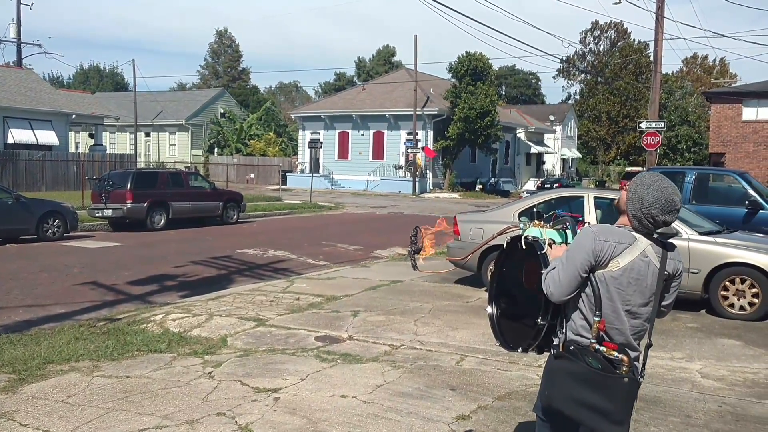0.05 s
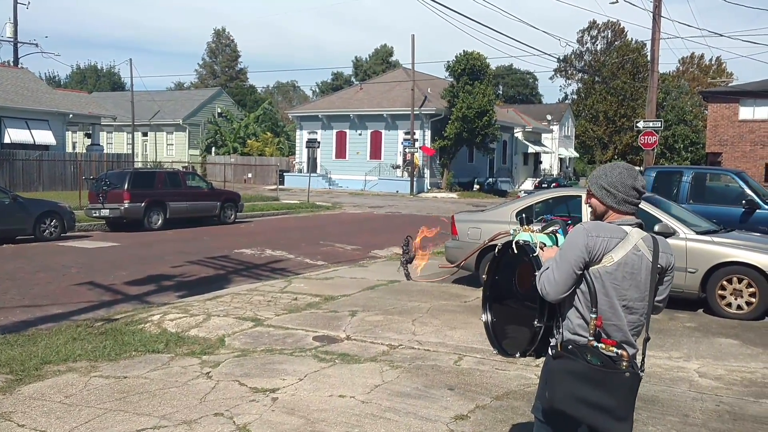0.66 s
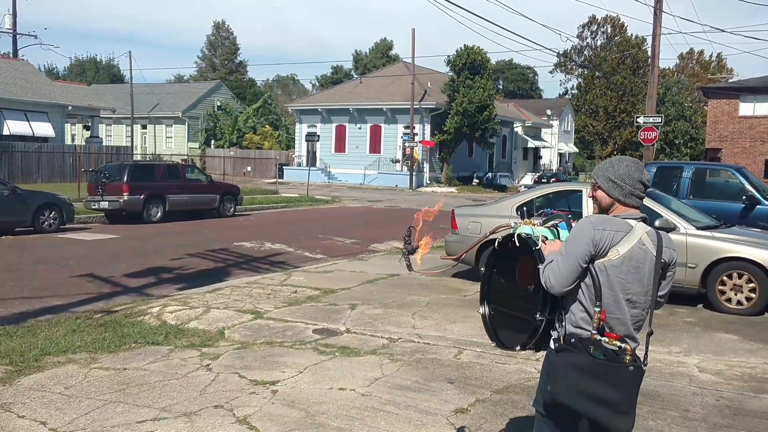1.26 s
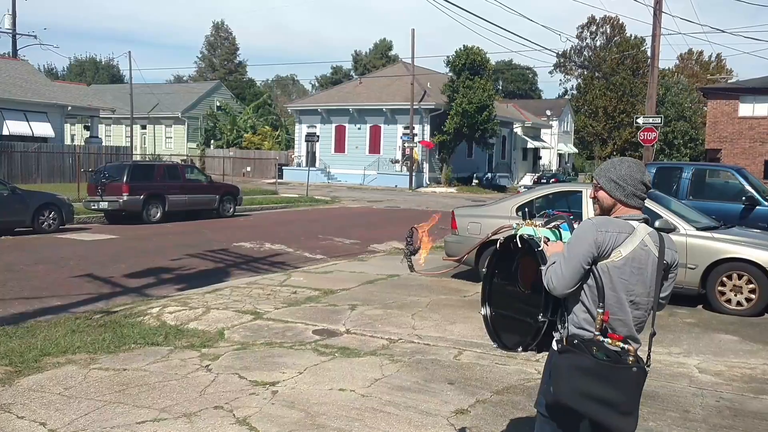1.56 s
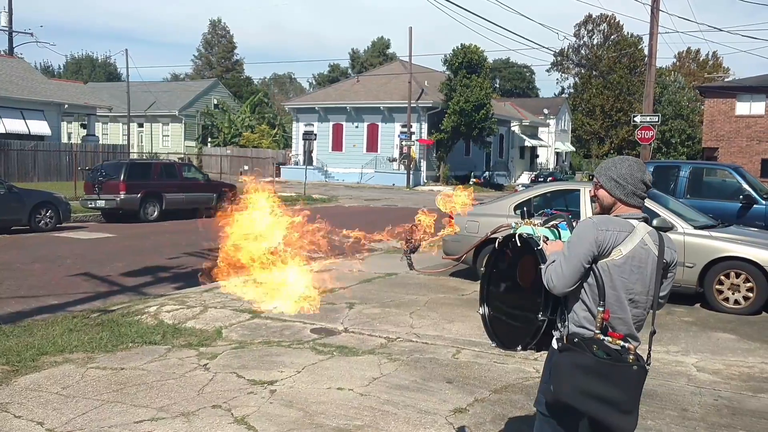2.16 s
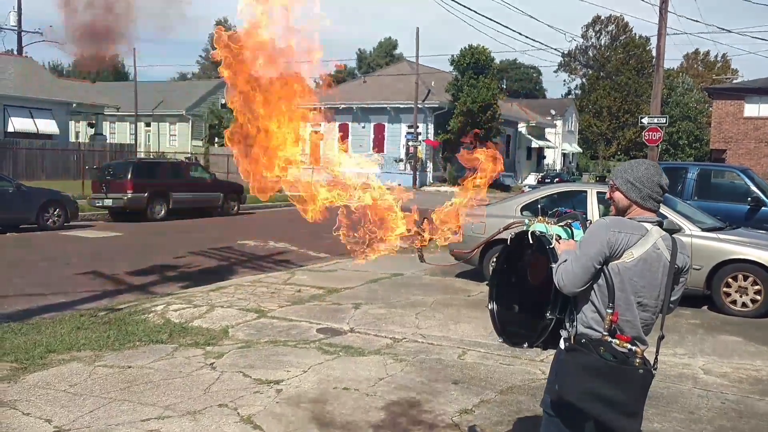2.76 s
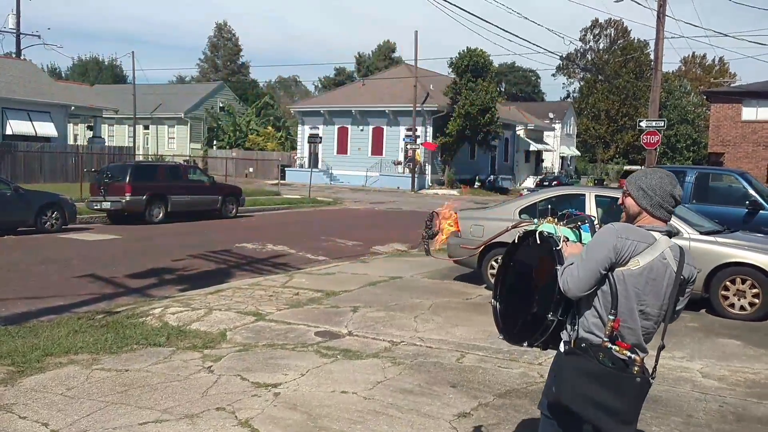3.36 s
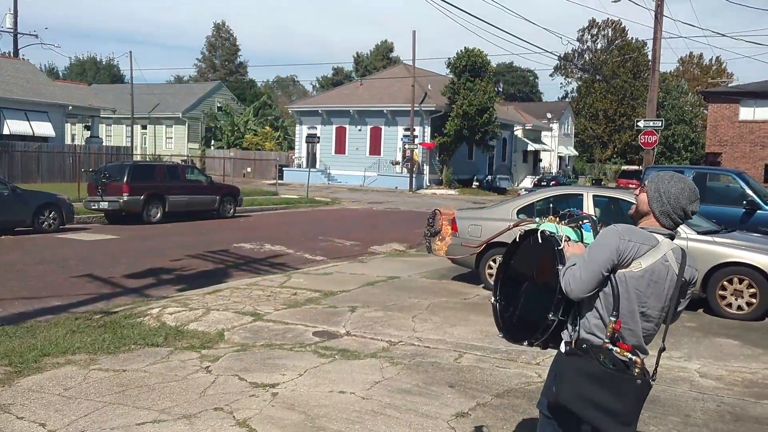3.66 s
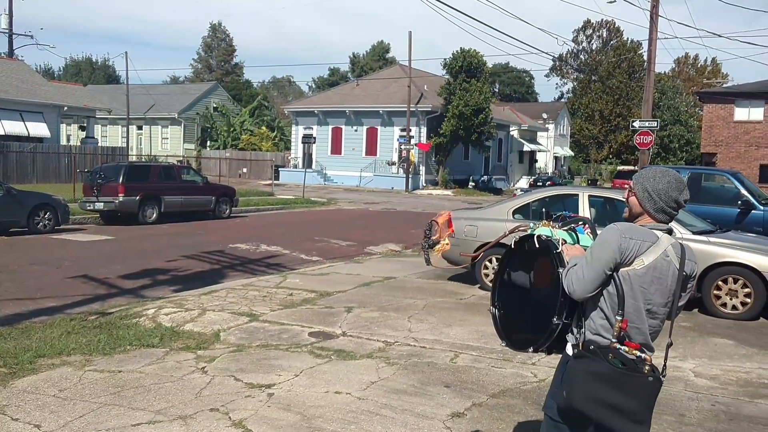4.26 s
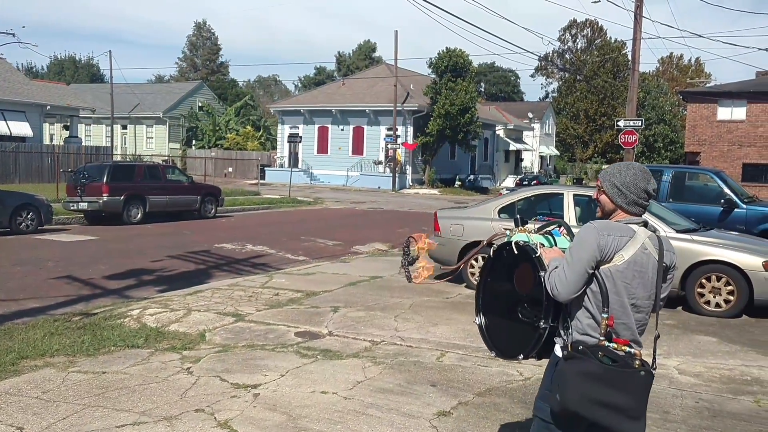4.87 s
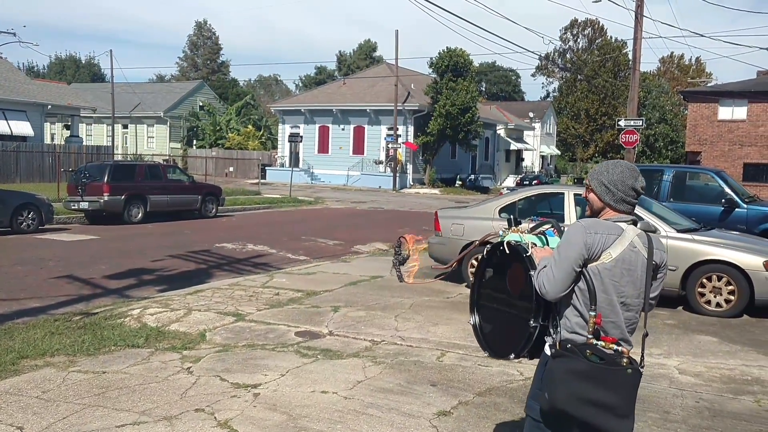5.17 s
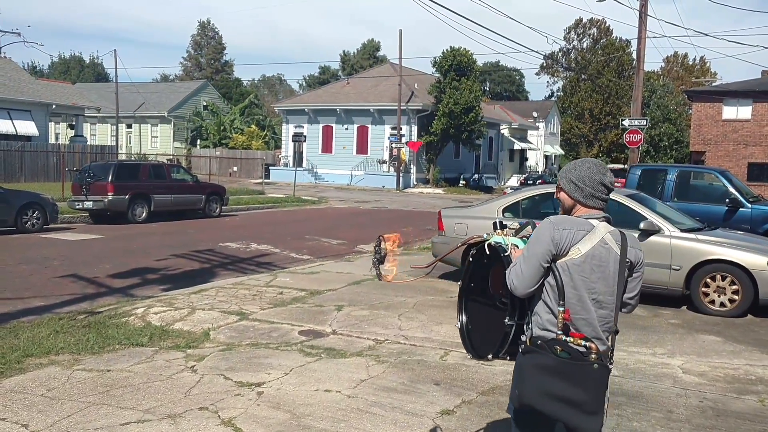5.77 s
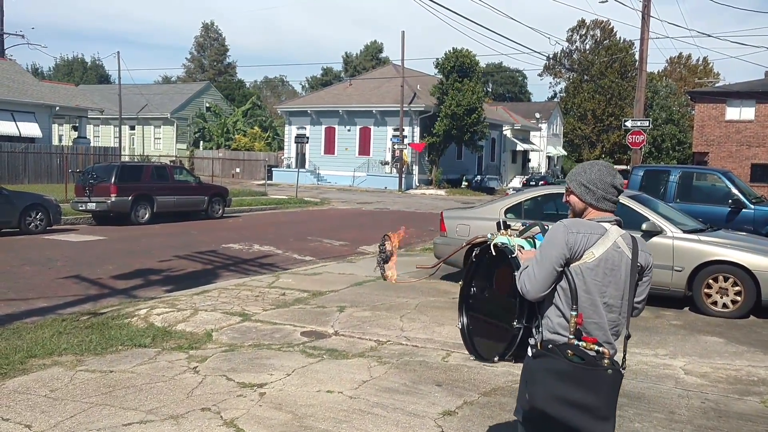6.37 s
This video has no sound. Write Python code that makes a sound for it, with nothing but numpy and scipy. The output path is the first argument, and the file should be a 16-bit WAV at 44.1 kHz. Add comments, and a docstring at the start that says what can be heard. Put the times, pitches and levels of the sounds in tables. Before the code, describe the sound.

Faint traffic and a hissing pilot flame, then a sudden whoosh and roar of fire that dies away, leaving low wind thuds.

```python
"""A quiet street, with a wash of distant traffic, a hissing pilot flame and a breeze buffeting two mics.
A flamethrower fires one burst: the valve snaps, the fuel jet hisses, and the fireball catches with a
thump and roars away, echoing off pavement, cars and house fronts. Small ticks, a thin insect buzz and
a far bird sit behind it. The camera widens the stereo image, and its limiter ducks the street under
the burst, then lets it swell slowly back."""
import sys
import numpy as np
from scipy import signal
from scipy.fft import rfft, irfft, next_fast_len
from scipy.io import wavfile
from scipy.ndimage import uniform_filter1d, minimum_filter1d, map_coordinates

SR = 44100
rng = np.random.default_rng(int(sys.argv[2]) if len(sys.argv) > 2 else 0)


def store_pcm(level_fs):
    """Save levels as 16-bit WAV."""
    pcm = np.round(np.clip(level_fs, -1, 1) * 32767).astype(np.int16)
    wavfile.write(sys.argv[1], SR, np.atleast_2d(pcm).T)


N = 287091
TIME = np.arange(N) / SR
VALVE_OPENS_S = 2.074
# how alike the ambience is at the two mics: f/Hz, correlation
MIC_LIKENESS = [(60, 0.92), (300, 0.91), (550, 0.68), (950, 0.42), (1500, -0.16), (2200, 0.023),
                (3300, 0.26), (5000, -0.02), (7500, 0.46), (10000, -0.021), (14500, -0.36)]


def gain_of(db):
    """Decibels to amplitude."""
    return 10 ** (np.asarray(db) / 20)


def unit_rms(x):
    """Scales to rms 1."""
    return x / np.sqrt(np.mean(x ** 2) + 1e-20)


def curve_at(points, hz):
    """A frequency curve, its points joined by straight lines over log frequency."""
    f, value = np.transpose(points)
    return np.interp(np.log(hz + 1), np.log(f + 1), value)


def automation(points):
    """A time curve's value at every sample."""
    return np.interp(TIME, *np.transpose(points))


def envelope(start, rise, until, fall_db_per_s, sag_db_per_s=0):
    """Ramps up, holds or sags until a given time, then dies away; times in seconds."""
    held = np.clip(TIME, start, max(start, until)) - start
    released = np.maximum(TIME - until, 0)
    attack = np.clip((TIME - start) / rise, 0, 1)
    return attack * gain_of(-sag_db_per_s * held - fall_db_per_s * released)


def delayed(x, seconds):
    """Delays by any fraction of a sample."""
    size = next_fast_len(N + SR // 10)
    hz = np.fft.rfftfreq(size, 1 / SR)
    return irfft(rfft(x, size) * np.exp(-2j * np.pi * hz * seconds), size)[..., :N]


def flutter(hz):
    """Random modulation of rms 1, moving at rates up to about hz."""
    f = np.fft.rfftfreq(N, 1 / SR)
    return unit_rms(irfft(rfft(rng.standard_normal(N)) / (1 + (f / hz) ** 2), N))


def noise(spectrum, patchy_db, tilt_db=0 * TIME, likeness=((20, 0), (20000, 0))):
    """Stereo coloured noise with drifting spectral patches, as long as its tilt curve (dB/octave)."""
    size = len(tilt_db)
    frames, hz = size // 256 + 5, np.fft.rfftfreq(1024, 1 / SR)
    a, b, c, d, patches = rng.standard_normal((5, frames, 513))
    patches = unit_rms(uniform_filter1d(uniform_filter1d(patches, size=8, axis=0), size=14, axis=1))
    slope = np.interp(np.arange(frames) * 256, np.arange(size), tilt_db)
    tilt = slope[:, None] * np.log2((hz + 1000) / 7000)
    alike = np.clip(curve_at(likeness, hz), -1, 1)
    left = a + 1j * b
    right = alike * left + np.sqrt(1 - alike ** 2) * (c + 1j * d)
    colour = gain_of(curve_at(spectrum, hz) + patchy_db * patches + tilt) * (hz > 0)
    spectra = np.array([left, right]) * colour
    return signal.istft(spectra.transpose(0, 2, 1), nperseg=1024, noverlap=768)[1][:, :size]


def eddy(at, hz, soft=6.1):
    """One swing of pressure: a peak between two troughs, more pointed the less soft it is."""
    u = (np.pi * hz * (TIME - at)) ** 2
    return (1 - (2 + 1 / soft) * u) / (1 + u / soft) ** (soft + 2)


def traffic():
    """Distant traffic merges into one slowly drifting wash."""
    # colour of the wash: f/Hz, level/dB
    spectrum = [(30, -39), (55, -5.5), (95, 3), (180, -3), (330, -4.5), (520, -10.5), (950, -10.5),
                (1500, -17), (1900, -20), (2250, -23.5), (2700, -20), (3400, -25.5), (5000, -33),
                (14500, -53)]
    # its slow drift: t/s, gain/dB
    drift = [(0, 0.7), (.72, 0), (.86, 2.1), (1.05, 0.1), (1.7, -1.5), (2.2, 0.3), (3.1, -2.5), (3.8, -2),
             (4.7, -2), (5.6, 0.8), (6.15, 0.5), (6.5, 4)]
    wash = unit_rms(noise(spectrum, patchy_db=0.71, likeness=MIC_LIKENESS))
    return wash * gain_of(-39 + automation(drift) + 0.57 * flutter(hz=6.9))


def pilot_flame():
    """The pilot flame burns with a faint, steady hiss."""
    # colour of the hiss: f/Hz, level/dB
    spectrum = [(1500, -25), (2600, 2), (3400, -1.5), (4200, -6), (5200, 4.5), (6100, -3), (6700, -8),
                (7350, 1.5), (7900, -6), (8800, -4), (9500, -7.5), (10700, -4.5), (12000, -13.5),
                (14500, -14.5)]
    # its loudness: t/s, level/dB
    level = [(0, -58), (.72, -57), (.86, -57), (1.05, -56.5), (2.0, -56.5), (3.2, -56.5), (4.2, -58),
             (5.2, -56), (6.1, -56.5), (6.5, -53)]
    hiss = unit_rms(noise(spectrum, patchy_db=1.5, likeness=MIC_LIKENESS))
    return hiss * gain_of(automation(level) + 0.45 * flutter(hz=11.0))


def breeze():
    """Lumpy, gusting turbulence, separate at each mic; single eddies hit the windward one."""
    # colour of the turbulence: f/Hz, level/dB
    spectrum = [(25, -18), (50, -15), (90, 7), (150, 5.5), (230, -7), (350, -16), (550, -30), (1000, -43),
                (2500, -78)]
    # the breeze between gusts: t/s, level/dB
    strength = [(0, -46), (.4, -53), (1.3, -51), (1.85, -33.5), (3.2, -35.5), (3.7, -53), (4.35, -51.5),
                (4.9, -38), (6.5, -28.5)]
    # which mic it favours: t/s, left minus right/dB
    side = [(0, 7), (1.4, 3.5), (4.75, 9), (5.08, 4.5), (5.2, -18), (6.35, -14), (6.5, -6)]
    # gusts: t/s, length/s, level/dB
    gusts = [(0.86, 0.084, -38), (1.042, 0.042, -38), (1.389, 0.03, -35), (1.602, 0.05, -30),
             (1.973, 0.023, -34), (2.884, 0.069, -26.5), (4.568, 0.13, -26), (5.195, 0.15, -26),
             (5.823, 0.26, -26.5), (6.33, 0.035, -30)]
    # single eddies: t/s, peak/dB, f/Hz
    buffets = [(0.874, -26, 157), (1.422, -12.5, 173), (1.526, -22, 180), (1.618, -25, 170),
               (1.6278, -20, 126), (1.642, -17, 120), (1.657, -17, 127), (1.6672, -13, 127),
               (1.697, -21, 145), (1.71, -23, 156), (1.76, -20, 153), (1.828, -19, 120), (1.839, -0.5, 153),
               (1.868, -13.5, 127), (1.9132, 0.5, 190), (2.0118, -15.5, 133), (2.731, -18, 148),
               (2.918, -9, 171), (3.11, -19.5, 159), (3.21, -19, 160), (4.5946, -7, 190),
               (4.6242, -12, 237), (4.6375, -19, 150), (4.6524, -27, 185), (4.6833, -10.5, 193),
               (4.693, -17, 151), (4.7253, -11, 174), (5.0603, -20.5, 153.9), (5.212, -11.5, 178.8),
               (5.2238, -15, 194), (5.251, -17, 148), (5.2721, -21, 183), (5.2916, -11.5, 215),
               (5.3291, -16, 144), (5.3512, -22, 180), (5.5024, -19, 153), (5.5182, -11, 231),
               (5.5686, -18, 143), (5.655, -21, 145), (5.8358, -23, 131), (5.8642, -15, 137),
               (5.9008, -7.5, 176), (5.9354, -22, 141), (5.9656, -13.5, 159), (5.984, -19, 203),
               (5.995, -10.5, 168), (6.0151, -15.5, 153), (6.0363, -5.5, 165), (6.0661, -4, 178),
               (6.1081, -18, 140), (6.234, -17, 163), (6.3426, -12, 149), (6.3577, -14, 151),
               (6.4933, -15.5, 195)]
    lumps_db = 2.0 * np.array([flutter(hz=25), flutter(hz=24.9)])
    turbulence = unit_rms(noise(spectrum, patchy_db=0) * gain_of(lumps_db))
    pan = gain_of(np.array([automation(side), -automation(side)]) / 2)
    pan /= np.sqrt(np.mean(pan ** 2, axis=0))
    gusting = sum(gain_of(db) * envelope(at, rise=0.012, until=at + length, fall_db_per_s=164)
                  for at, length, db in gusts)
    swell = np.hypot(gain_of(automation(strength)), gusting)
    thuds = sum(gain_of(db) * eddy(at, hz, soft=np.interp(db, [-15, 0], [5.7, 3.2]))  # harder is sharper
                for at, db, hz in buffets)
    windward = pan > pan[::-1]
    return turbulence * pan * swell + windward * thuds


def ticks():
    """Small ticks and knocks, like gear being handled: fast-dying puffs of band-passed noise."""
    # the hits: t/s, level/dB, centre f/Hz, decay/s
    hits = [(1.803, -35, 740, 0.0026), (2.957, -35, 9500, .005), (4.145, -38, 640, .014),
            (5.808, -41, 1690, 0.0024), (6.055, -49, 9000, 0.0018), (6.203, -48, 10000, .006),
            (6.355, -24.5, 1100, 0.001)]
    out = np.zeros((2, N))
    for at, db, hz, decay in hits:
        band = signal.butter(2, [hz / 2, min(hz * 2, SR / 2 - 1000)], "band", fs=SR)
        puff = unit_rms(signal.lfilter(*band, rng.standard_normal((2, N))))
        age = np.maximum(TIME - at, 0)
        out += gain_of(db) * puff * (age > 0) * np.exp(-age / decay)
    return out


def valve():
    """The dry, bright snap of the valve as the pressure lets go."""
    at, hold_s = 2.0745, 0.0012
    snap = unit_rms(signal.lfilter(*signal.butter(2, 4700, "high", fs=SR), rng.standard_normal(N)))
    return gain_of(-9) * snap * envelope(at, rise=0.0006, until=at + hold_s, fall_db_per_s=4500)


def jet():
    """The nozzle's turbulent hiss: a flow that slowly dulls, with short spurts of fuel on top."""
    # colour of the hiss: f/Hz, level/dB
    spectrum = [(1000, -8.5), (2000, -14.5), (2900, 1.5), (3800, 0.5), (5000, 3), (6200, 0.5), (7300, 6),
                (8100, 2), (9100, 2.5), (10000, -2.5), (11400, -4), (12600, -5), (14200, -10), (15300, -21)]
    # spurts, the first as the valve cracks open:
    # t/s, level/dB, rise/s, hold/s, fall/(dB/s), tilt/(dB/octave)
    spurts = [(2.077, -21, 0.00067, 0.018, 496, 5.5), (2.092, -9, 0.0034, 0.034, 400, 2),
              (2.17, -21.5, 0.014, .03, 260, 0), (2.364, -26, 0.018, 0.024, 200, 2.5),
              (2.402, -23, 0.011, 0.025, 499, -0.5), (2.514, -31, 0.02, 0.023, 200, -3)]
    shuts_s = 2.51
    age = np.clip(TIME - VALVE_OPENS_S, 0, 1)
    hiss = noise(spectrum, patchy_db=2.2, tilt_db=0.5 - 10 * age)[0]
    hiss /= np.sqrt(uniform_filter1d(hiss ** 2, size=4096) + 1e-20)  # tilt changes colour, not loudness
    flow = envelope(VALVE_OPENS_S, rise=0.027, until=shuts_s, fall_db_per_s=55, sag_db_per_s=21)
    hiss *= gain_of(-22) * flow
    for at, db, rise, hold, fall, tilt in spurts:
        spurt = unit_rms(noise(spectrum, patchy_db=2.5, tilt_db=np.full(SR // 2, tilt))[0])
        hiss += gain_of(db) * np.resize(spurt, N) * envelope(at, rise, at + rise + hold, fall)
    return hiss * gain_of(flutter(hz=253))


def flame():
    """The fluttering roar: the fuel catches with a flare, burns on while fed, dwindles and goes out."""
    # colour of the roar: f/Hz, level/dB
    spectrum = [(40, -12), (100, -2), (300, 0.3), (520, -9.5), (830, -7.5), (1200, -9.5), (1800, -13),
                (2600, -16.5), (5000, -26)]
    lights_s, flares_s, dwindles_s, out_s = 2.081, 2.091, 2.637, 2.933
    burn = envelope(lights_s, rise=0.024, until=dwindles_s, fall_db_per_s=39, sag_db_per_s=13.5)
    flare = envelope(flares_s, rise=0.0036, until=flares_s + 0.0476, fall_db_per_s=450)
    blaze = np.hypot(gain_of(-20) * burn, gain_of(-18.5) * flare)
    dying_db = 144 * np.maximum(TIME - out_s, 0)
    roar = unit_rms(noise(spectrum, patchy_db=1.5)[0])
    return roar * blaze * gain_of(1.4 * flutter(hz=44.9) - dying_db)


def boom():
    """The deep push of air as the fireball swells: a few pressure pulses in a short rumble."""
    # pulses as the cloud of fuel catches: t/s, peak/dB, f/Hz
    ignition = [(2.1428, -5, 230), (2.1545, 6, 197), (2.1640, 2, 105), (2.1755, -6, 130)]
    # colour of the rumble: f/Hz, level/dB
    spectrum = [(25, 3), (60, 2), (130, -5), (280, -1.5), (600, -21.5), (2000, -58)]
    pulses = sum(gain_of(db) * eddy(at, hz) for at, db, hz in ignition)
    swell = gain_of(-7.5) * envelope(start=2.14, rise=0.014, until=2.1624, fall_db_per_s=1001)
    rumble = unit_rms(noise(spectrum, patchy_db=-0.5)[0])
    return rumble * swell - pulses


def draught():
    """The air that the fireball shoves aside washes over the left mic."""
    # slow swings of that air: t/s, peak/dB, f/Hz
    pushes = [(2.161, -12, 55), (2.195, -24, 42)]
    left = sum(gain_of(db) * eddy(at, hz) for at, db, hz in pushes)
    return np.array([left, np.zeros(N)])


def reverb(x, t60, predelay_s, lowpass_hz):
    """Many small echoes, different at each mic and dulled in the treble."""
    t = np.arange(SR // 2) / SR
    taps = rng.standard_normal((2, len(t))) * (rng.random((2, len(t))) < 2000 / SR)  # 2000 a second
    taps *= gain_of(-60 * t / t60) * (t > predelay_s)
    taps = signal.lfilter(*signal.butter(1, lowpass_hz, fs=SR), taps)
    return signal.fftconvolve(x[None], taps / np.linalg.norm(taps[0]), axes=1)[:, :N]


def camera_shadow(x):
    """The camera body shades its mics unequally from a sound ahead; close side reflections join in."""
    # side signal against mid: f/Hz, level/dB
    side_level = [(500, -16), (1500, -28), (2600, -12.5), (3900, -15), (4400, 0.5), (7500, -0.5), (9200, 8),
                  (11500, 5), (13000, 8), (14200, 7)]
    # side signal against mid: f/Hz, phase/rad
    side_phase = [(200, -0.5), (3500, -0.74), (4400, -1.5), (9600, -0.84), (10600, 2), (13500, 1.5)]
    hz, mid = np.fft.rfftfreq(N, 1 / SR), rfft(x)
    width, send = gain_of(curve_at(side_level, hz)), gain_of(-7.5)
    reflected = rfft(reverb(x, t60=0.041, predelay_s=0.001, lowpass_hz=14000)[0])
    shifted = mid * np.exp(1j * curve_at(side_phase, hz))
    side = width * (shifted + send * reflected) / np.hypot(1, send)
    return irfft(np.array([mid + side, mid - side]) / np.sqrt(1 + width ** 2), N)


def burst():
    """The whole shot: snap, boom and draught, with hiss and roar echoing around the street."""
    # slaps off the pavement and parked cars: delay/s, level/dB
    echoes = [(.00325, -9.5), (.0079, -20.5), (0.0138, -15), (0.0206, -24)]
    direct = jet() + flame()
    stretch = 1 + 0.051 * np.clip(TIME - VALVE_OPENS_S, 0, 1)  # paths lengthen as the fireball climbs
    slaps = sum(gain_of(db) * map_coordinates(direct, [(TIME - delay * stretch) * SR], order=3)
                for delay, db in echoes)
    house_fronts = gain_of(-18) * reverb(direct, t60=0.51, predelay_s=0.02, lowpass_hz=5000)
    return camera_shadow(direct + slaps + valve() + boom()) + house_fronts + draught()


def insect():
    """A thin, sustained buzz: one tone whose pitch jitters quickly."""
    # loudness of the buzz: t/s, level/dB
    level = [(2.5, -86), (3.1, -69), (3.65, -76), (4.15, -65), (4.5, -79), (5.0, -71), (5.8, -74),
             (6.5, -76)]
    pitch_hz = 6140 * (1 + 0.011 * flutter(hz=250))
    return gain_of(automation(level)) * unit_rms(np.sin(2 * np.pi * np.cumsum(pitch_hz) / SR))


def bird():
    """A far bird's faint, arched whistles waver in pitch and reach the left mic first."""
    # whistles: t/s, length/s, top f/Hz, level/dB
    chirps = [(3.857, 0.048, 3440, -49), (3.86, .06, 4450, -56), (3.938, 0.086, 4460, -56),
              (5.89, 0.063, 6650, -54)]
    song, waver = np.zeros(N), 0.0119 * flutter(hz=152)
    for at, length, hz, db in chirps:
        progress = np.clip((TIME - at) / length, 0, 1)
        pitch_hz = hz * (1 - 0.31 * (progress - 0.6) ** 2 + waver)
        song += gain_of(db) * np.sin(np.pi * progress) * np.sin(2 * np.pi * np.cumsum(pitch_hz) / SR)
    return np.array([song, delayed(song, seconds=0.00006)])


def scene():
    """Everything as it reaches the two mics."""
    return burst() + traffic() + pilot_flame() + insect() + breeze() + ticks() + bird()


def widener(x, delay_samples):
    """Each channel subtracts a delayed share of the other: wide bass, and a comb in the middle."""
    # crossfeed between the channels: f/Hz, share
    crossfeed = [(100, 0.79), (1300, 0.77), (2600, 0.89), (6500, 0.7), (9500, 0.56), (14500, 0.9)]
    share = curve_at(crossfeed, np.fft.rfftfreq(N, 1 / SR))
    opposite = np.pad(x[::-1], ((0, 0), (delay_samples, 0)))[:, :N]
    return x - irfft(share * rfft(opposite), N)


def limiter(x, ceiling_db, hold_s, release_db_per_s):
    """Peaks over the ceiling pull the gain down at once; it holds, then climbs back."""
    peak = uniform_filter1d(-minimum_filter1d(-abs(x).max(0), size=160), size=160)
    over_db = np.maximum(20 * np.log10(abs(peak) + 1e-9) - ceiling_db, 0)
    half_hold = int(hold_s * SR / 2)
    held_db = -minimum_filter1d(-over_db, 2 * half_hold + 1, origin=half_hold, mode="constant")
    climb_db = release_db_per_s * TIME
    reduction_db = np.maximum.accumulate(held_db + climb_db) - climb_db
    return x / gain_of(reduction_db)


def record(dry):
    """The camera's chain: the mics' bass roll-off, stereo widener, limiter and a steep high cut."""
    thinned = signal.lfilter(*signal.butter(2, 48, "high", fs=SR), dry)
    wide = widener(thinned, delay_samples=17)
    ducked = limiter(wide, ceiling_db=-8.0, hold_s=1.246, release_db_per_s=10.5)
    high_cut = signal.firwin(511, 15300, window=("kaiser", 9), fs=SR)
    return signal.oaconvolve(ducked, high_cut[None], "same")


dry = scene()
out = record(dry)
store_pcm(out)
```